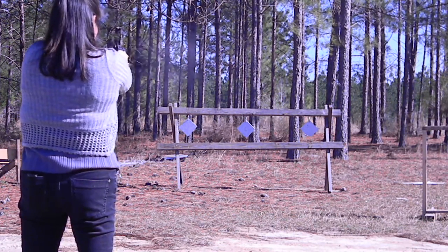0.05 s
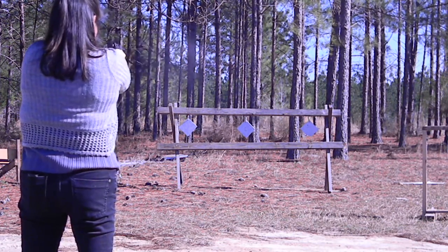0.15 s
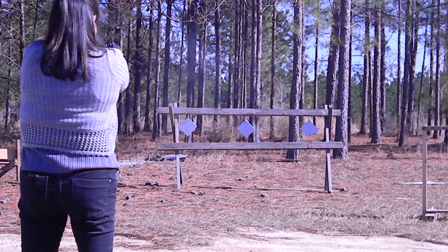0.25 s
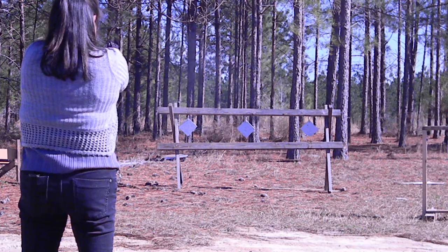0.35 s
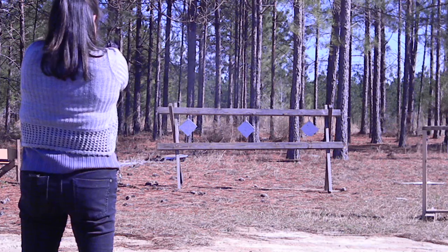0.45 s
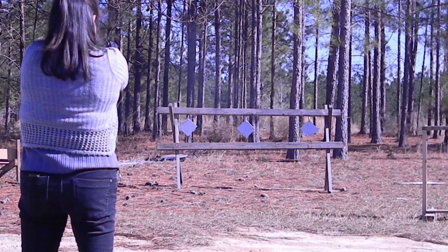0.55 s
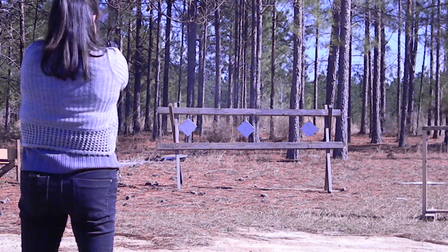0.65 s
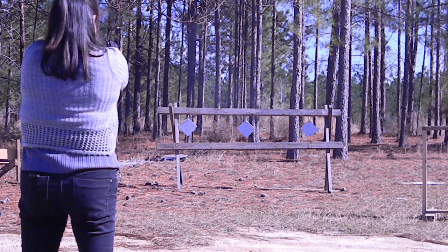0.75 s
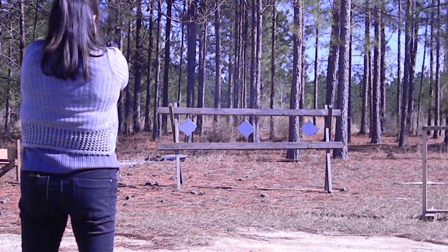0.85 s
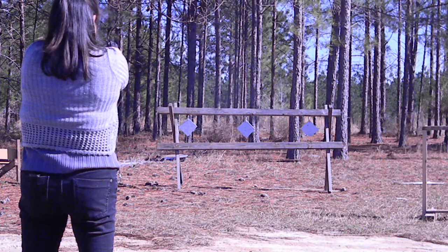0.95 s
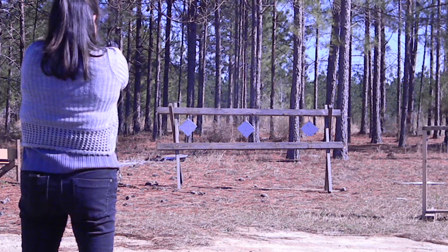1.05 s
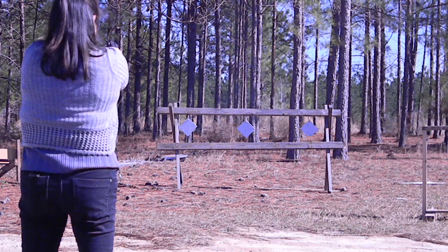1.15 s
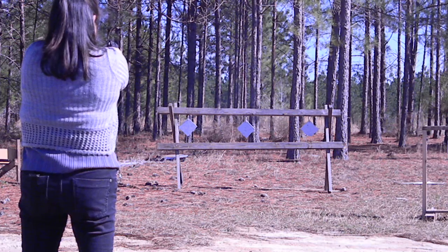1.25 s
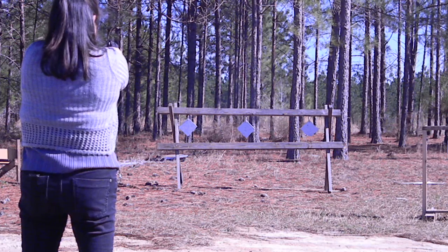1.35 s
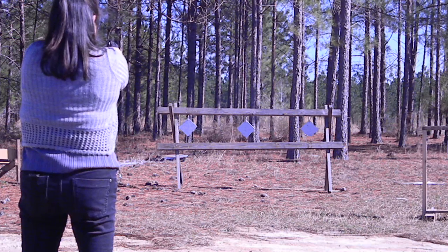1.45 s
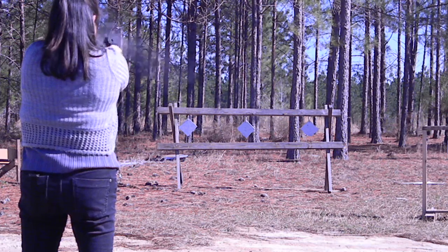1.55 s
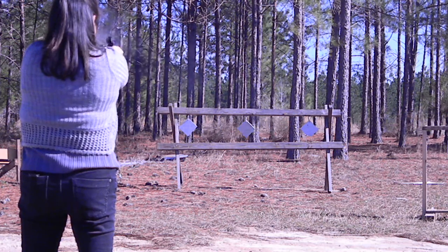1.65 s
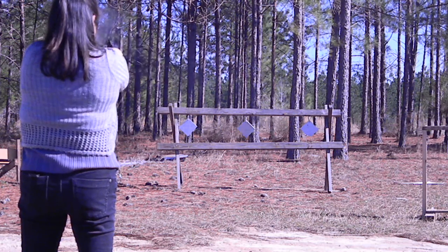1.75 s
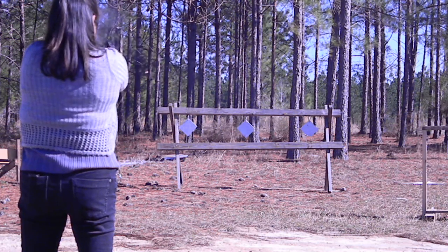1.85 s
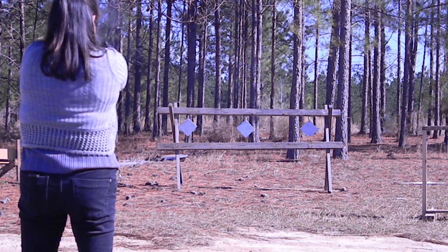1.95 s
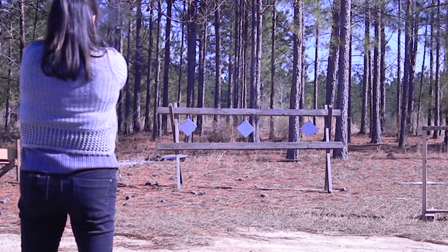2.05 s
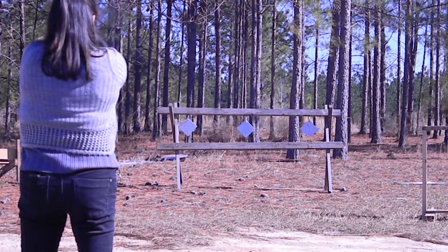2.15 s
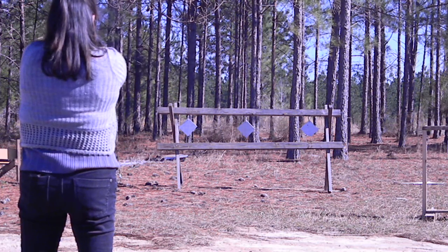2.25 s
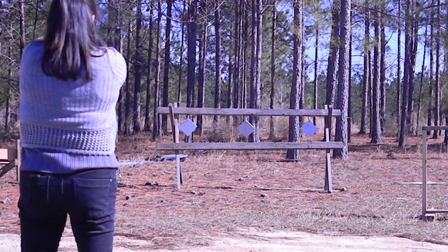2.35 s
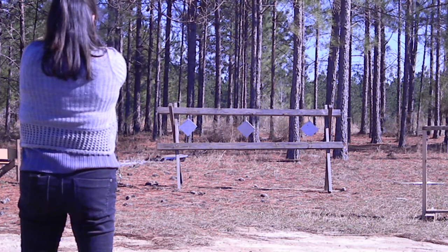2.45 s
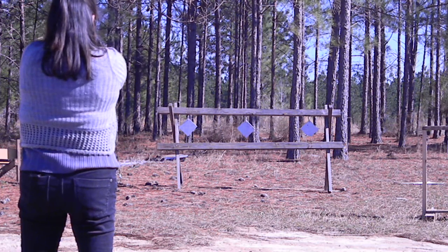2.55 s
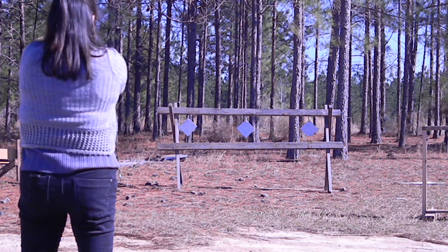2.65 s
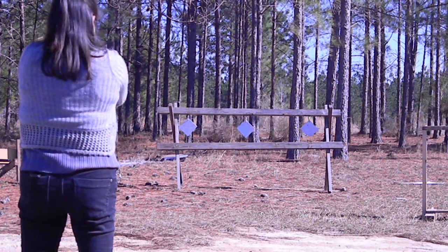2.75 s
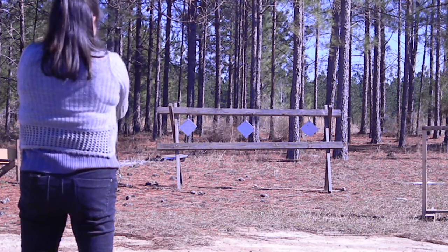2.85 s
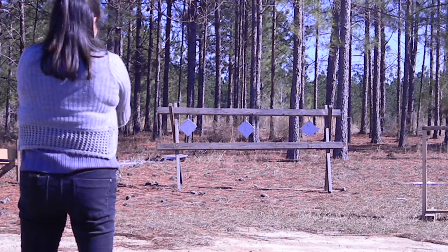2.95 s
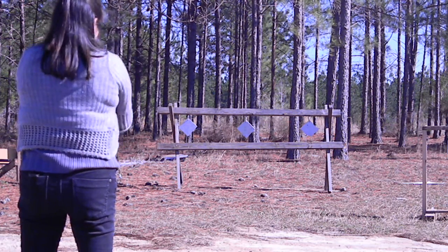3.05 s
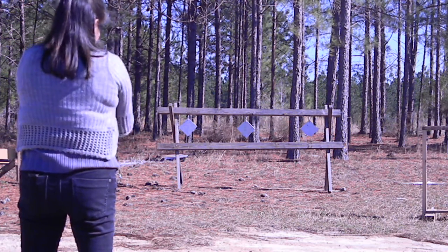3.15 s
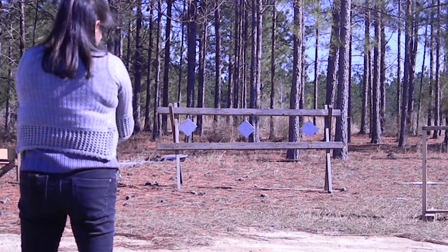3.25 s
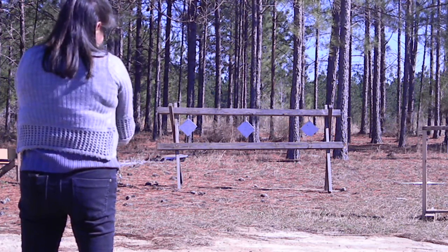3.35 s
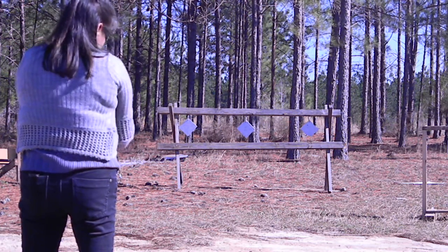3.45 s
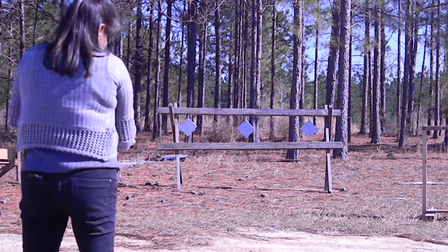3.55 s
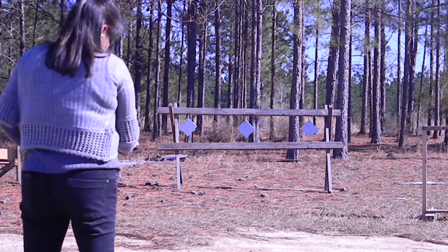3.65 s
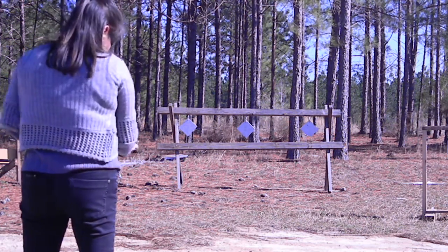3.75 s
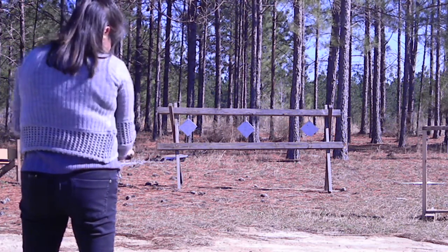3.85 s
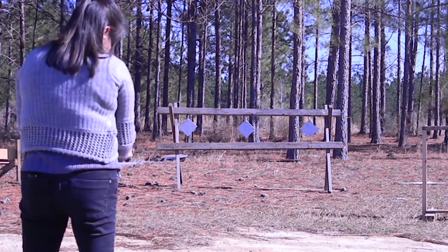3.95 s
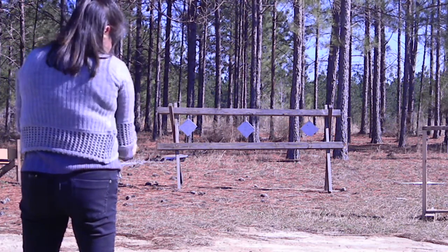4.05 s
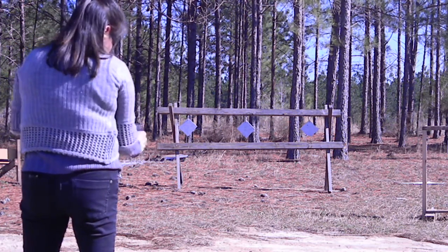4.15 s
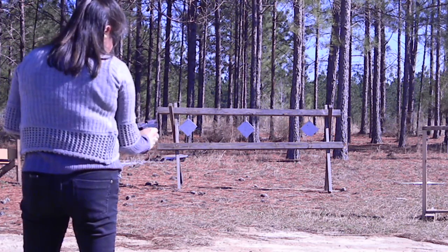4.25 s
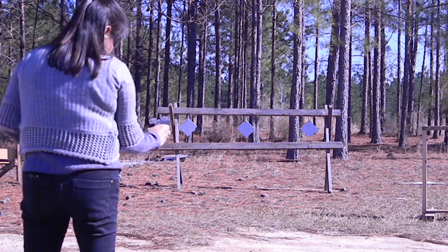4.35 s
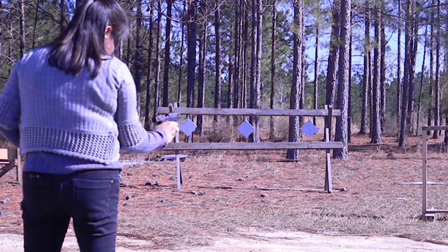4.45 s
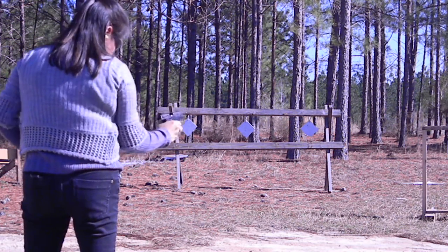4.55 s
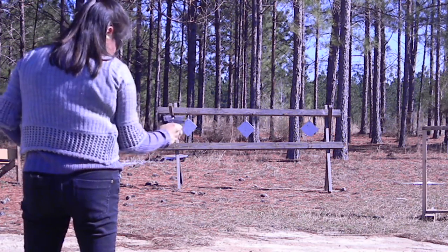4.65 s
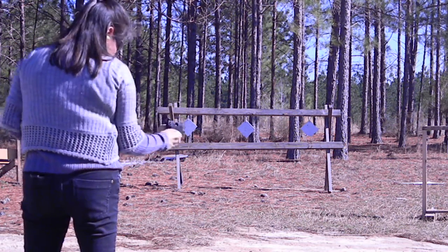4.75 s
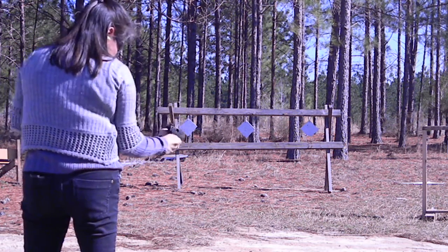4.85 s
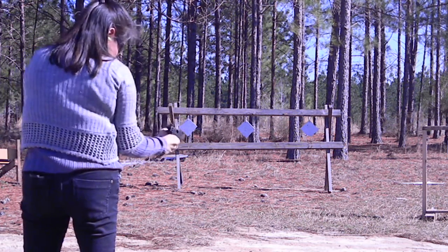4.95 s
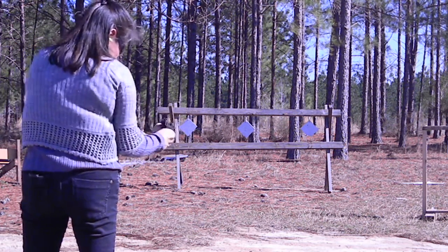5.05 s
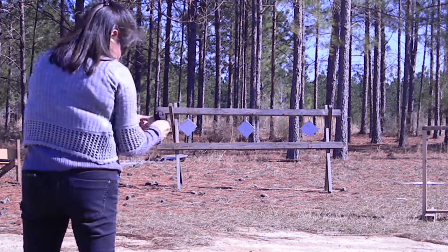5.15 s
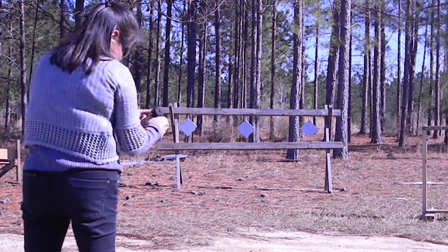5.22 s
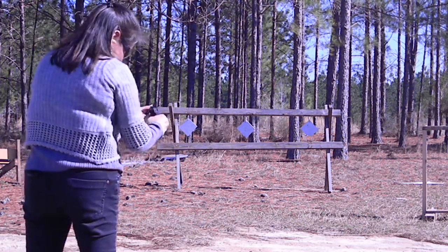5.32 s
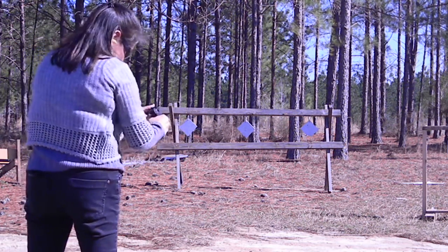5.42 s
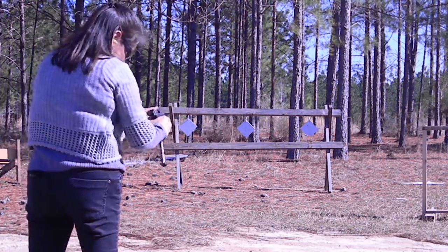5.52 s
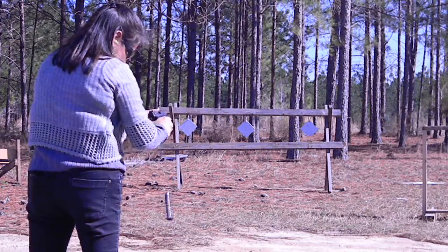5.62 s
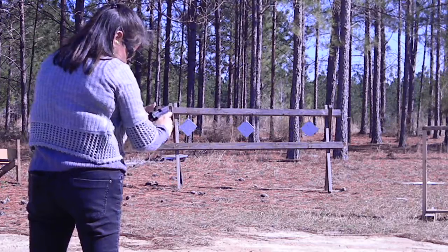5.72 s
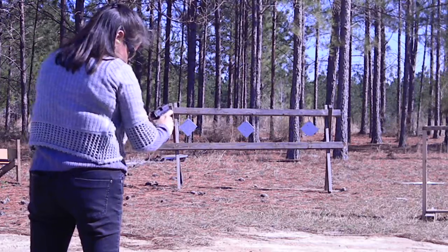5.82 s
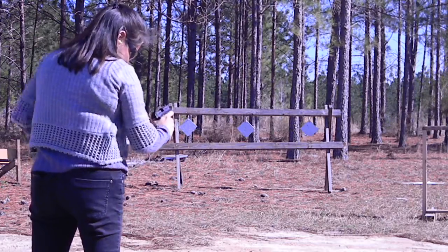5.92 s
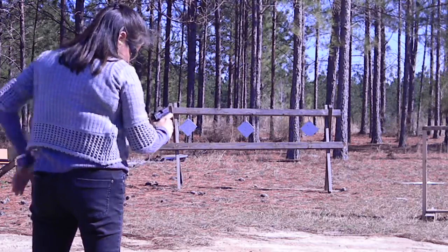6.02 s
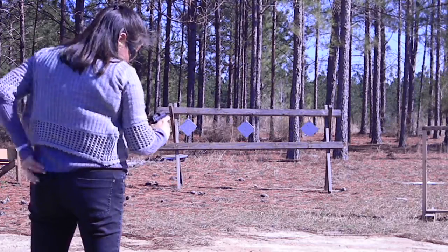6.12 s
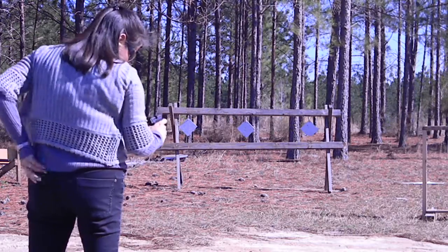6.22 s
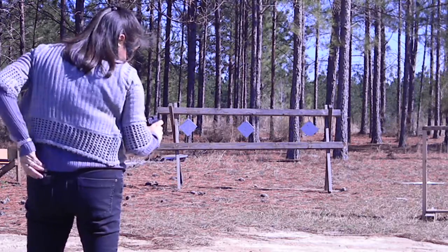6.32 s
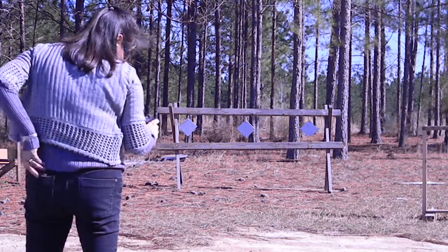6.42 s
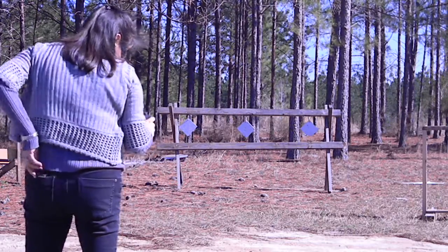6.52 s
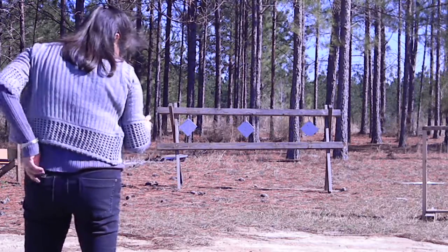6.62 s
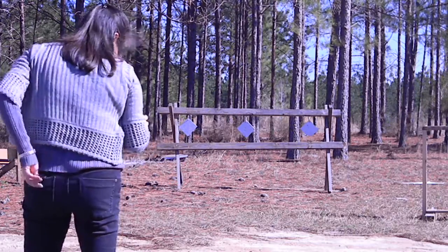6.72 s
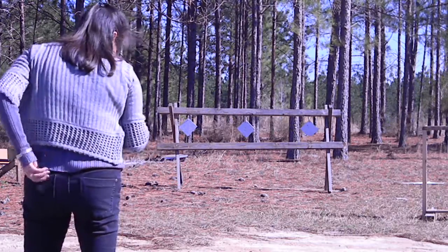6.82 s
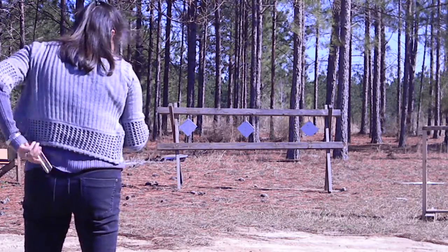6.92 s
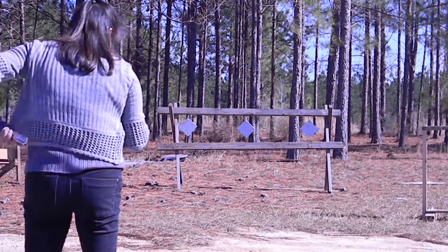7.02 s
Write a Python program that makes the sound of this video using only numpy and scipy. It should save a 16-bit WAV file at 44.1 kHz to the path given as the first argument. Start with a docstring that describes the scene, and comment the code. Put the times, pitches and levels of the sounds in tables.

```python
"""Pistol range in a pine forest

The scattered echo of one shot dies away; a second cracks, rings a steel plate and the trees answer for 2 s.
Cases tick on sand (noise bursts); later a magazine is released and a slide worked (rattle noise, damped modes).
Wind buffets the camera's two close microphone ports (low noise, thumps) over faint treetops and hiss.
The port pair, a phase turn plus unrelated sound, widens the image: near antiphase around 350 Hz."""
import sys
import numpy as np
from scipy import signal
from scipy.fft import rfft, irfft, next_fast_len
from scipy.io import wavfile
from scipy.ndimage import uniform_filter1d, map_coordinates

SR = 44100
rng = np.random.default_rng(int(sys.argv[2]) if len(sys.argv) > 2 else 0)


def generate_wav(signal):
    """Clip the signal to [-1, 1] and save it as 16-bit WAV at the path in sys.argv[1]."""
    frames = np.transpose(np.atleast_2d(signal))
    scaled = np.clip(frames, -1, 1) * 32767
    pcm = np.round(scaled).astype(np.int16)
    wavfile.write(sys.argv[1], SR, pcm)


N = 312228
T = np.arange(N) / SR  # s

# Muzzle blasts, the first before the start: t/s
SHOTS_S = [-0.3323, 1.5465]
# Relative blast spectrum: f/Hz, density/dB per Hz
BLAST_SPECTRUM = [(60, -31), (200, -22.5), (400, -1), (700, -4), (900, -3.5), (1600, -2), (2500, -6.5),
                  (5000, -9.5), (9000, -16), (12000, -24.5), (16000, -25)]
# Treble loss in air and forest: f/Hz, loss/dB per s
AIR_LOSS = [(300, 6), (1000, -2), (2300, 5.5), (3500, 11.5), (4500, 19.5), (6000, 31.5), (10000, 61.5),
            (16000, 135)]
# Near trunks' answer to a blast: t after blast/s, relative level/dB
NEAR_ECHO = [(0, -39), (.007, -19.5), (.13, -18.5), (.22, -23), (.4, -23.5), (.55, -26.5), (.7, -31.5),
             (.74, -34), (.77, -35.5), (.95, -37), (1.65, -40), (2.0, -46), (2.75, -50.5), (5.6, -87)]
# Far walls of trees: t after blast/s, relative level/dB, t60/s
TREE_LINES = [(1.069, -24.5, 0.64), (1.57, -29, 0.19)]
# Single trunks: t/s, level over the forest scatter/dB
TRUNKS = [(0.097, -1), (0.15, -6), (0.198, 14), (1.561, -5), (1.583, -3), (1.604, 6.5), (1.668, 17),
          (1.676, 11), (1.722, 5)]
LINE_RISE_S, PATCHY_DB = .025, 0.77  # far-line build-up; uneven answer in pitch and time

# Steady buffeting: t/s, relative level/dB
WIND_LEVEL = [(0, -45), (.18, -52), (.24, -65), (.6, -57), (.85, -53.5), (1.1, -64), (1.6, -58.5),
              (2.3, -61), (3.4, -60), (4.1, -48), (4.45, -49.5), (5.0, -45.5), (5.4, -41), (5.72, -40.5),
              (5.85, -54.5), (6.3, -52), (6.5, -41), (6.85, -54.5), (7.08, -47.5)]
# Relative buffeting spectrum: f/Hz, density/dB per Hz
BUFFET_SPECTRUM = [(12, -53), (20, -11.5), (76, 0.5), (97, 0.5), (162, -8), (230, -32), (400, -34),
                   (520, -59.5), (880, -120)]
# Thumps of air on the ports: t/s, relative level/dB, Gaussian sigma/s
GUSTS = [(0.152, -46, 0.014), (0.361, -51, 0.0207), (.70, -40.5, 0.029), (2.51, -54, 0.0216),
         (3.139, -48, 0.018), (3.328, -54, 0.0435), (3.599, -48, 0.027), (3.93, -63.5, 0.02),
         (4.129, -47, 0.031), (4.31, -36.5, 0.0226), (4.669, -37, 0.016), (4.82, -44, 0.015),
         (4.992, -52, 0.011), (5.153, -23, 0.0094), (5.191, -40.5, 0.016), (5.372, -37, 0.029),
         (5.452, -34, 0.012), (5.651, -35, 0.008), (6.107, -40, 0.011), (6.241, -44.5, 0.0068),
         (6.466, -33.5, 0.0091), (6.587, -28, 0.011), (6.964, -36, 0.0084)]
FLUTTER_DB, FLUTTER_KNOTS_PER_S = 2.5, 10  # random swing of the steady part
THUMP_HZ, THUMP_LOG_SPREAD, THUMP_NOISE = 95, .1, .35  # push pitch, its scatter, noise gain

# Relative spectrum of treetops and circuit hiss: f/Hz, density/dB per Hz
QUIET_SPECTRUM = [(120, -51), (200, -18.5), (288, -18), (379, 0.5), (481, -0.5), (527, -6), (599, -6.5),
                  (864, -11.5), (1040, -12), (2790, -21.5), (3170, -23), (5900, -31), (15800, -44.5)]

# Brass on sand: t/s, relative level/dB, spray t60/s (held to 0.01-0.3)
CASES = [(0.413, -27.5, 0.048), (0.622, -35, 0.34), (0.7754, -56.5, 0.055), (2.219, -27, 0.19),
         (2.2554, -45, 0.054), (2.5057, -30, 0.05), (2.5195, -31.5, 0.073)]

# Plate struck, then swinging onto its hanger: t/s, crack/dB, slap/dB, ring/dB, ring rise/s
PLATE_HITS = [(1.6111, 2, -19.5, -24, 0.063), (1.733, -8, -11, -25.5, 0.0038)]
# Plate modes: f/Hz
PLATE_HZ = [2458, 3503, 4258, 5540, 6053, 6290, 7413, 9593, 9851, 10480, 10720, 11790, 12490, 14200]
# Same modes: face-hit level/dB, hanger-knock level/dB, t60/s
PLATE_MODES = [(10, 5.5, 0.21), (-3, 0.5, 0.28), (-2, -15, .13), (-8, -15, .2), (-4, -8, 0.58),
               (-2, -9, 0.34), (-10, -9, 0.2), (-7, -19, .25), (-7, -19, .2), (-9, -27, 0.47),
               (-15, -35, .2), (2.5, -40, 0.26), (-3, -32, 0.18), (-5, -29.5, .22)]
WAVER_DB, WAVER_KNOTS_PER_S = 4, 40  # random waver in each mode's level
CRACK_TOP_HZ = 11900  # low-pass for gas crack and lead on steel

# Catch, magazine and slide contacts: t/s, relative level/dB, rattle t60/s, dull share/0-1,
# ring/dB, knock/dB, free ringing/s
HANDLING = [(5.4863, -8, 0.0067, 0.39, -11, -27, 0.0033), (5.4894, -15.5, .018, 0.35, -11, -30, .0028),
            (5.5092, -21, .02, 0.14, -1.5, -28, 0.0059), (5.520, -32, .04, .1, 0, -28, .009),
            (5.556, -38, .029, 0.4, -4, -25, 0.0055), (5.872, -6, 0.014, 0.06, -22, -12, .004),
            (5.8742, -15.5, 0.018, .05, 2.5, -26, .0045), (5.8803, -19, 0.034, 0.25, 3, -35, .006),
            (5.888, -7, .018, 0.1, -4, -19.5, 0.0058), (5.8914, -14.5, 0.031, 0.2, 2, -22, 0.0053),
            (5.8962, -9.5, 0.013, 0.1, -1, -24, .0045), (5.906, -25, .02, .1, 4, -21, 0.0044),
            (5.912, -34, .018, .1, 0, -21, .003), (5.961, -31.5, .031, 0, -12, -24, .006),
            (6.035, -37.5, .023, .24, -1, -14, .006), (6.221, -31, 0.011, .15, 2, -22, .0022),
            (6.2243, -45, .02, .1, 3, -22, 0.0039), (6.2315, -44, .02, .1, 4, -24, .005),
            (6.84, -34.5, .0445, .9, -14, -16, .005), (6.9493, -21, 0.018, 0.8, -16, -17, .004)]
# Slide modes: f/Hz, relative level/dB, undamped t60/s
SLIDE_MODES = [(2720, -5, .04), (3040, -9, .03), (3172, 0, .04), (4590, -10, .017), (5960, -12, .018),
               (6650, -17, .012), (7350, -17, .016), (8490, -14, .015), (9560, -20, .014)]
# Magazine modes: f/Hz, relative level/dB, undamped t60/s
MAGAZINE_MODES = [(1920, -8, .015), (2400, -3, .017), (2710, 0, .025), (2950, -3, .018), (3745, -5, .02),
                  (4250, -7, .016), (4900, -10, .012), (5710, -10, .015), (7750, -18, .012),
                  (9660, -24, .01)]
# Grip modes: f/Hz, relative level/dB, t60/s
GRIP_MODES = [(406, 5, 0.021), (790, 8.5, 0.012), (1250, 3, 0.0097)]
# Relative spectrum of loose steel parts: f/Hz, density/dB per Hz
RATTLE_SPECTRUM = [(150, -55), (500, -29), (1200, -13.5), (2000, -8.5), (3100, -1.5), (4500, -0.5),
                   (5800, -7.5), (8000, -12.5), (10000, -17), (12000, -24), (16000, -20)]
# Slide rings between these, magazine outside: from/s, to/s
SLIDE_WORKED_S = (5.7, 6.5)
DAMP_DB, DAMP_S = -21, 0.00091  # parts seat and mute their ring: loss, time taken
MUFFLED_HZ = 1300  # centre of a contact muffled by the hand

# Port pair, sound from ahead: f/Hz, likeness/0-1, left lag/rad
AHEAD = [(148, 1, 0.15), (360, 0.7, 3.17), (920, 0.96, 2.49), (2000, 0.49, 2.04), (3540, 0.83, 1.36),
         (5520, 1, 1.42), (9200, 0.33, 0.235), (14000, 0.08, .01)]
# Port pair, sound from all round: f/Hz, likeness/0-1, left lag/rad
AROUND = [(150, 0.14, 0.37), (346, 0.94, 3.08), (1440, 0.87, 2.95), (2750, 0.81, 2.8), (4553, 0.35, 2.7),
          (9000, 0.069, 2.5), (12300, 0.03, 0.36), (15000, 0.74, .2)]
# Low band mono: from/s, to/s
MONO_SPANS = [(-.1, .45), (1.775, 2.287)]
MONO_HZ = 2950  # mono below this
CLIP_LEVEL, TOP_HZ = .86, 15950  # soft-clip ceiling; band limit


def amp(db):
    """dB to amplitude ratio."""
    return 10 ** (np.asarray(db) / 20)


def unit(x):
    """Scales to unit RMS."""
    return x / np.sqrt(np.mean(x ** 2) + 1e-20)


def along(points, hz):
    """Each column after the frequency, read on a log axis."""
    f, *cols = np.transpose(points)
    return np.squeeze([np.interp(np.log(hz + 1), np.log(f + 1), c) for c in cols])


def curve(rows):
    """Breakpoints to one value per sample."""
    return np.interp(T, *np.transpose(rows))


def wobble(knots_per_s):
    """Smooth random curve through normal knots."""
    knots = rng.standard_normal(int(N * knots_per_s / SR) + 4)
    return map_coordinates(knots, [T * knots_per_s])


def filtered(x, response):
    """Applies a complex response of frequency."""
    m = next_fast_len(N + 8192)
    return irfft(rfft(x, m) * response(np.fft.rfftfreq(m, 1 / SR)), m)[..., :N]


def ports(a, b, pair):
    """Left hears a; right hears it turned in phase and mixed with b."""
    def right(hz):
        alike, lead_rad = along(pair, hz)
        alike = np.clip(alike, 0, 1)
        return np.array([alike * np.exp(1j * lead_rad), np.sqrt(1 - alike ** 2)])
    return np.array([a, filtered(np.array([a, b]), right).sum(axis=0)])


def ring(modes, rise_s, scatter_db, waver_db=0):
    """Damped modes, new strengths and phases per blow, optional random waver in level."""
    t = T[:SR // 2]
    total = np.zeros(len(t))
    for hz, db, t60 in modes:
        level_db = db + rng.normal(0, scatter_db) - 60 * t / t60
        if waver_db:
            level_db = level_db + waver_db * map_coordinates(rng.standard_normal(64), [t * WAVER_KNOTS_PER_S])
        total += amp(level_db) * np.sin(2 * np.pi * (hz * t + rng.random()))
    return (1 - np.exp(-t / rise_s)) * total


def puff(t60):
    """Exponentially dying noise burst."""
    return amp(-60 * T[:SR // 2] / t60) * rng.standard_normal(SR // 2)


def add(track, s, sound):
    """Mixes a sound in at s seconds."""
    part = track[round(s * SR):][:len(sound)]
    part += sound[:len(part)]


def soften(x):
    """Rounds off the top of a crack."""
    return signal.sosfilt(signal.butter(2, CRACK_TOP_HZ, fs=SR, output="sos"), x)


def since_shot(t):
    """Seconds since the latest blast."""
    return t - np.where(t < SHOTS_S[1], *SHOTS_S)


def echo_level(age_s):
    """Forest gain: powers of near trunks and far tree lines summed."""
    power = amp(np.interp(age_s, *np.transpose(NEAR_ECHO))) ** 2
    for s, db, t60 in TREE_LINES:
        since = np.clip(age_s - s, 0, None)
        power = power + (amp(db - 60 * since / t60) * (1 - np.exp(-since / LINE_RISE_S))) ** 2
    return np.sqrt(power)


def forest():
    """Countless trunks scatter each blast; later echoes came further and lost more treble."""
    lumps = amp(1.146 * wobble(400) + 0.4 * wobble(29.96))
    scatter = unit(rng.standard_normal((2, N)) * lumps)
    for s, db in TRUNKS:
        add(scatter[0], s, amp(db) * puff(0.00088))
    age_s = since_shot(T)
    hz, frame_s, z = signal.stft(scatter * echo_level(age_s), SR, nperseg=256)
    patches = rng.standard_normal(z.shape[1:])
    patches = uniform_filter1d(uniform_filter1d(patches, size=4, axis=0), size=7, axis=1)
    colour_db = along(BLAST_SPECTRUM, hz)[:, None] + 11.5
    loss_db = along(AIR_LOSS, hz)[:, None] * since_shot(frame_s)
    z = z * amp(PATCHY_DB * unit(patches) + colour_db - loss_db)
    echoes = signal.istft(z, SR, nperseg=256)[1][:, :N]
    # far tree line stands to the left: dB per s of age
    lean = amp(np.outer([1.3, -1.3], np.clip(age_s, 0, 1.3)))
    return ports(*echoes, AHEAD) * lean


def wind():
    """Lumpy turbulence noise plus single air pushes, partly shared by the ports, stronger on the left."""
    a, b = filtered(rng.standard_normal((2, N)), lambda hz: amp(along(BUFFET_SPECTRUM, hz)))
    lumps = amp(2.9 * np.array([wobble(25), wobble(29)]))
    strength = amp(curve(WIND_LEVEL) + FLUTTER_DB * wobble(FLUTTER_KNOTS_PER_S))
    push = np.zeros((2, N))
    draws = rng.standard_normal((len(GUSTS), 3))
    for (s, db, sigma_s), (pitch, phase, apart) in zip(GUSTS, draws):
        swell = amp(db) * np.exp(-.5 * ((T - s) / sigma_s) ** 2)
        strength = strength + THUMP_NOISE * swell
        thump_hz = THUMP_HZ * np.exp(THUMP_LOG_SPREAD * pitch)
        turn = 2 * np.pi * thump_hz * (T - s) + np.pi * phase
        push = push + swell * np.sin(turn + np.array([[0], [1.2 * apart]]))
    noise = np.array([unit(a), unit(.5 * a + b)])
    return amp([[3.5], [-3.5]]) * (strength * noise * lumps + push)


def quiet():
    """Far treetops and circuit hiss: coloured noise, slowly uneven in level."""
    noise = filtered(rng.standard_normal((2, N)), lambda hz: amp(along(QUIET_SPECTRUM, hz)))
    a, b = unit(noise)
    level_db = -42 + 0.22 * wobble(1.6) + 0.95 * wobble(9.7) + np.array([[.4], [-.4]])
    return amp(level_db) * ports(a, b, AROUND)


def cases():
    """Light brass on sand: a bright tick and a spray, both high-passed noise."""
    pair = np.zeros((2, N))
    for s, db, t60 in CASES:
        for track in pair:
            tick = puff(0.0052)
            spray = 0.47 * puff(np.clip(t60, .01, .3))
            add(track, s, amp(db - 10.5) * (tick + spray))
    return ports(*filtered(pair, lambda hz: hz ** 2 / (hz ** 2 + 4500 ** 2)), AHEAD)


def muzzle():
    """Hammer ticks, gas cracks, and the pressure pulse rings the camera body."""
    body_modes = [(427.6, 0.5, 0.043), (548, 2.0, 0.032), (968, 8.5, 0.015), (1510, -8, 0.017)]  # Hz, dB, t60/s
    blast_s = SHOTS_S[1]
    pair = np.zeros((2, N))
    for track in pair:
        add(track, blast_s - .0022, amp(-16.5) * puff(0.028))  # hammer
        add(track, blast_s + .0009, amp(-0.9) * soften(puff(0.011)))  # gas
        add(track, blast_s + 0.0015, amp(-11.0) * ring(body_modes, 0.0015, 0.97))
    thump = np.zeros(N)
    u = T[:SR // 10] / 0.00304
    add(thump, blast_s + 0.00206, amp(-18) * (1 - u) * np.exp(-u))  # pressure pulse
    return ports(*pair, [(300, 0.93, 1.0), (2000, 1.0, 0.77), (6000, 0.1, .1)]) + thump


def plate():
    """Steel plate: sharp crack, dull slap and modes of randomly wavering level, from straight ahead."""
    crack, slap, tone = np.zeros((3, N))
    u = T[:200] / .00011
    for k, (s, crack_db, slap_db, ring_db, rise_s) in enumerate(PLATE_HITS):
        add(crack, s, amp(crack_db) * np.sin(3.8 * u) * np.exp(-u))
        add(crack, s, amp(crack_db - 17) * puff(0.0059))  # splash
        add(slap, s, amp(slap_db) * puff(0.094) * (1 - np.exp(-T[:SR // 2] / 0.011)))
        modes = [(hz, db[k], t60) for hz, (*db, t60) in zip(PLATE_HZ, PLATE_MODES)]
        add(tone, s, amp(ring_db) * ring(modes, rise_s, 1.25, WAVER_DB))
    # blast colour with 0.26 s of air loss
    slap = filtered(slap, lambda hz: amp(along(BLAST_SPECTRUM, hz) + 14.0 - 0.26 * along(AIR_LOSS, hz)))
    return soften(crack) + slap + ports(tone, .5 * tone, AHEAD)


def near_scatter(x, t60):
    """Convolves with a unit-energy dying noise."""
    return signal.fftconvolve(x, unit(puff(t60)) / np.sqrt(SR // 2))[:N]


def handling():
    """Contacts rattle parts, ring slide or magazine, knock the grip; the nearest trees scatter them."""
    rattle, dull, body = np.zeros((3, N))
    for s, db, t60, share, ring_db, knock_db, free_s in HANDLING:
        burst = amp(db) * puff(t60)
        share = np.clip(share, 0, 1)
        add(rattle, s, (1 - share) * burst)
        add(dull, s, share * burst)
        steel = SLIDE_MODES if SLIDE_WORKED_S[0] < s < SLIDE_WORKED_S[1] else MAGAZINE_MODES
        damping_db = DAMP_DB * np.clip((T[:SR // 2] - free_s) / DAMP_S, 0, 1)
        steel_ring = amp(ring_db + damping_db) * ring(steel, 0.00061, 1.2)
        grip_knock = amp(knock_db) * ring(GRIP_MODES, 0.00087, 4.0)
        add(body, s, amp(db) * (steel_ring + grip_knock))
    rattle = filtered(rattle, lambda hz: amp(along(RATTLE_SPECTRUM, hz) + 2.0))
    rattle = rattle + filtered(dull, lambda hz: 2.2 / (1 + (np.log(hz / MUFFLED_HZ + 1e-9) / .38) ** 4))
    direct = body + rattle
    trees = amp(-10.5) * (rattle + 0.29 * body)
    a = direct + near_scatter(trees, 0.37)
    b = near_scatter(direct, 0.085) + near_scatter(trees, 0.83)
    return ports(a, b, AHEAD) * amp([[-1.1], [1.1]])


def scene():
    """Sum of all sources."""
    return forest() + wind() + quiet() + cases() + muzzle() + plate() + handling()


def record(dry):
    """In the mono spans both low bands become the left one, +0.5 dB; then soft clip and band limits."""
    share = sum(np.clip(np.minimum(T - a, b - T) / .03 + .5, 0, 1) for a, b in MONO_SPANS)  # 30 ms fades
    low = filtered(dry, lambda hz: hz < MONO_HZ)
    folded = dry + share * (amp(0.5) * low[0] - low)
    clipped = folded / (1 + np.abs(folded / CLIP_LEVEL) ** 4) ** .25
    return filtered(clipped, lambda hz: (hz < TOP_HZ) * hz ** 2 / (hz ** 2 + 18 ** 2))


dry = scene()
out = record(dry)
generate_wav(out)
```